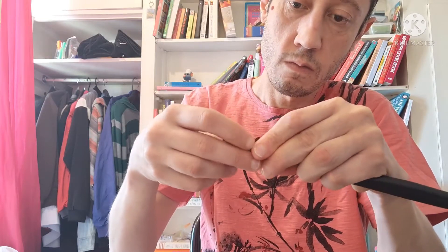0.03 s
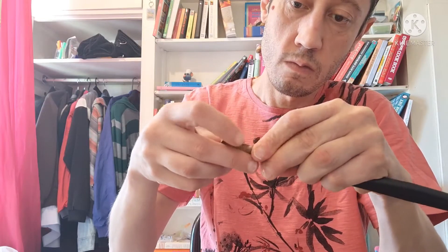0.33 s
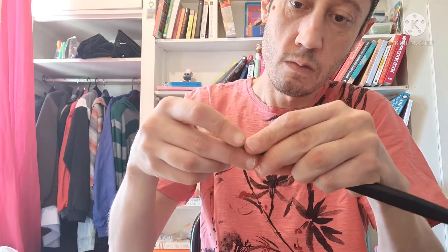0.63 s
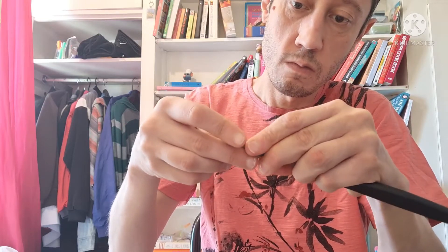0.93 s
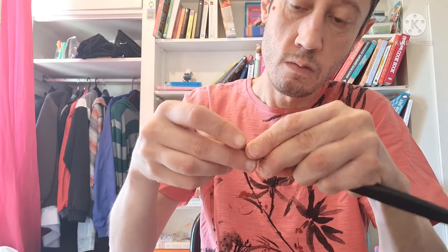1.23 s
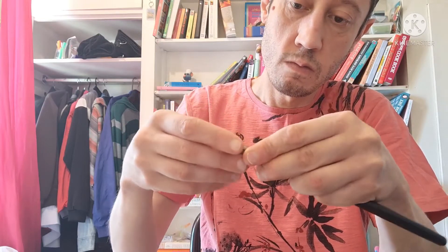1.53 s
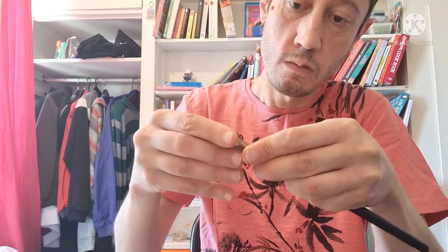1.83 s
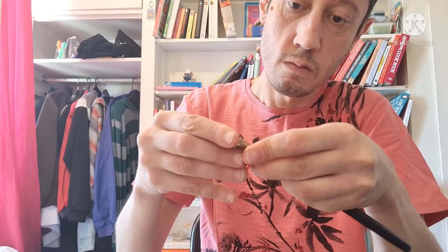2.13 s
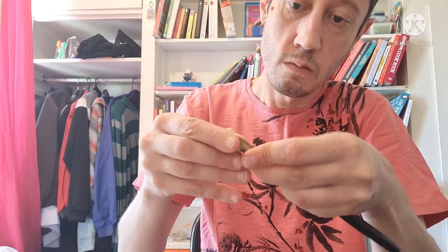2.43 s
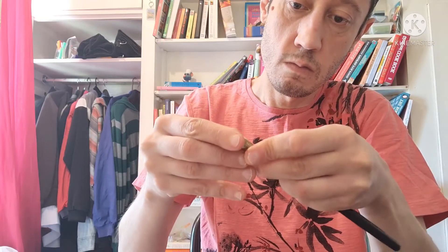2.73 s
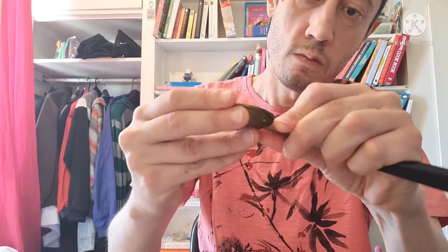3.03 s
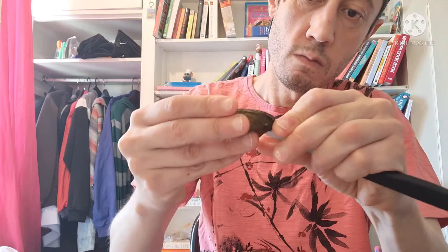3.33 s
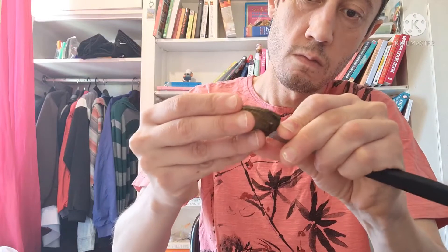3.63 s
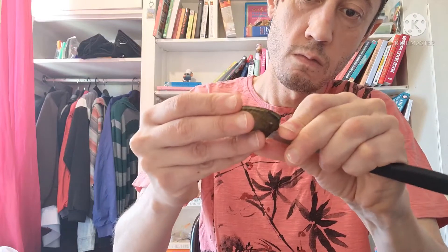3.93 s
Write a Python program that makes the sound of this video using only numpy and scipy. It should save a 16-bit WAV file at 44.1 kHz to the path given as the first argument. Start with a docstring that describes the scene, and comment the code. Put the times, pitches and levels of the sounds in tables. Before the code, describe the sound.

A small shell clicks, scrapes and cracks under a hand tool in a quiet room.

```python
"""A quiet furnished room, a phone microphone close to a small shell being picked at with a hand tool.
The tip ticks and scrapes on the shell, then bites, and the rim chips in a run of sharp cracks.
Every contact rings the same short shell modes, followed by quick reflections and a brief room tail.
Behind the work lie a wavering low hum and soft room noise."""
import sys
import numpy as np
from scipy import signal
from scipy.fft import rfft, irfft
from scipy.io import wavfile

SR = 44100
rng = np.random.default_rng(int(sys.argv[2]) if len(sys.argv) > 2 else 0)


def bounce(signal):
    """Save signal as a 16-bit WAV file at the path given by the first command-line argument."""
    frames = np.transpose(np.atleast_2d(signal))
    limited = np.clip(frames, -1, 1)
    pcm = np.round(limited * 32767).astype(np.int16)
    wavfile.write(sys.argv[1], SR, pcm)


N = 176400

# the five registers of a contact, named knock, body, edge, ring and fizz:
# (low edge [Hz], high edge [Hz], room send [dB], lag at the right microphone port [s])
REGISTERS = [(774, 3330, -4, 0.000089), (2765, 5040, -8, 0.000062), (4130, 5480, -8, 0.000066),
             (6400, 9340, -10, 0.00012), (10200, 18000, -7.5, 0.000066)]


def undb(db):
    """Decibels to gain."""
    return 10 ** (np.asarray(db) / 20)


def unit(x):
    """Scale to rms 1."""
    return x / np.sqrt(np.mean(x ** 2) + 1e-30)


def fader(points):
    """Gain curve through (time [s], level [dB]) points."""
    return undb(np.interp(np.arange(N) / SR, *np.array(points).T))


def decay(t, t60):
    """Envelope that falls 60 dB in t60 seconds."""
    return np.exp(-np.log(1000) * t / t60)


def colour(x, points):
    """Shape a sound by (frequency [Hz], gain [dB]) points on a log-frequency axis."""
    hz, db = np.array(points).T
    f = np.maximum(np.fft.rfftfreq(N, 1 / SR), 1)
    return irfft(rfft(x) * undb(np.interp(np.log(f), np.log(hz), db)), N)


def walk(rate_hz):
    """Smooth random drift with rms 1."""
    f = np.fft.rfftfreq(N, 1 / SR)
    return unit(irfft(rfft(rng.standard_normal(N)) * np.exp(-.5 * (f / rate_hz) ** 2), N))


def tones(partials, level, drift_hz):
    """Sines that wander in pitch and beat, under one level curve."""
    x = sum(undb(db) * np.sin(2 * np.pi * np.cumsum(hz + wander * walk(drift_hz)) / SR)
            for hz, db, wander in partials)
    return np.sqrt(2) * x * fader(level)


def room_noise():
    """Soft room tone that eases off slowly, near the centre in the bass and wide above."""
    # room tone spectrum: (frequency [Hz], relative density [dB])
    air_spectrum = [(20, -5.5), (45, 5), (70, 2), (85, 2), (100, 1), (150, -8.5), (200, -1.5), (280, -6.5),
                    (360, -12.5), (480, -3.5), (530, -11), (680, -0.5), (810, -2.5), (900, 1.5),
                    (1120, -6.5), (1450, -23), (2200, -26.5), (3100, -26.5), (5000, -34.5), (9000, -42.5),
                    (12000, -38.5), (16000, -40.5)]
    # its stereo width: (frequency [Hz], side minus mid [dB])
    air_width = [(60, -5.5), (150, -11), (300, -7.5), (600, -2.5), (950, 5), (2000, -0.5), (10000, 0.5)]
    # its loudness: (time [s], level [dB])
    air_level = [(0, -57), (1.3, -56.5), (2.1, -57.5), (4, -59.5)]
    mid, side = rng.standard_normal((2, N))
    pair = mid + colour(side, air_width) * np.array([[1], [-1]])
    flatten = [(hz, -10 * np.log10(1 + undb(db) ** 2)) for hz, db in air_width]  # width adds no power
    return fader(air_level) * unit(colour(colour(pair, flatten), air_spectrum))


def hum(pan_db=-2.5):
    """Two close low tones beat, a little to the right, and die away; a narrow drone wavers above."""
    # hum partials: (frequency [Hz], relative level [dB], wander [Hz])
    hum_partials = [(56.3, 0, 1.23), (47.8, -8.5, 1.68), (109.3, -27, 7.08)]
    # swell of the hum: (time [s], level [dB])
    hum_level = [(0, -57.5), (.2, -56), (.3, -51.5), (.78, -50.5), (1.02, -59), (1.2, -54.5),
                 (1.451, -52.5), (1.8, -48.5), (2.05, -51.5), (2.25, -49), (2.6, -49.5), (2.87, -60),
                 (3.05, -54), (3.16, -70), (4, -71.5)]
    # the drone's two close tones: (frequency [Hz], relative level [dB], wander [Hz])
    drone_partials = [(224.3, -1.5, 3.43), (218.5, -3.5, 2.985)]
    # swell of the drone: (time [s], level [dB])
    drone_level = [(0, -63.5), (.6, -66), (1.1, -68), (1.6, -64), (2.1, -66.5), (2.8, -59.5), (3.2, -64.5),
                   (4, -70.5)]
    low = tones(hum_partials, hum_level, drift_hz=2.68)
    drone = tones(drone_partials, drone_level, drift_hz=4.03)
    return low * undb(np.array([[pan_db], [-pan_db]]) / 2) + drone


def room(registers, tail_t60_s=0.17, near_t60_s=0.085, near_db=5, gap_s=0.0033):
    """Direct sound at two ports, quick reflections from hands and chest, and the short room tail."""
    t, samples = np.arange(SR // 2) / SR, np.arange(N)
    tail, near = (unit(rng.standard_normal((2, len(t))) * decay(t, t60) * (t > gap_s))
                  for t60 in (tail_t60_s, near_t60_s))
    echo = unit(tail + undb(near_db) * near) / np.sqrt(len(t))
    direct, send = 0, 0
    for (left, right), (_, _, send_db, lag) in zip(registers, REGISTERS):
        late_right = np.interp(samples - lag * SR, samples, right)
        direct = direct + np.array([left, late_right])
        send = send + undb(send_db) * np.array([left, right])
    return direct + signal.fftconvolve(send, echo, axes=1)[:, :N]


def two_ports(count, own_gain=0.38):
    """Contact noise as two microphone ports get it: mostly shared, partly their own."""
    noise = rng.standard_normal((3, count))
    return noise[0] + own_gain * noise[1:]


def shell(force, tip_hz, levels_db, length_s, noise_db):
    """A force rings the shell over bare contact noise; each register gets its level over length_s."""
    # shell modes: (frequency [Hz], relative level [dB], t60 [s])
    shell_modes = [(943, -16, 0.0094), (1846, -5.5, 0.0045), (3084, -0.5, 0.02), (3227, -16, 0.088),
                   (3544, -3.5, 0.012), (4435, -11.5, 0.0051), (4864, -12, 0.011), (5556, -9, 0.012),
                   (6460, -11, .007), (11630, -12.5, 0.0043), (13800, -8, 0.0021)]
    tip_db, tip_t60_s = 1, 0.0049  # a bright mode whose pitch depends on where the tip bears
    t = np.arange(SR // 10) / SR
    centres = np.array([np.sqrt(lo * hi) for lo, hi, *_ in REGISTERS])
    rings = np.zeros((len(REGISTERS), len(t)))
    for hz, db, t60 in shell_modes + [(tip_hz, tip_db, tip_t60_s)]:
        nearest = np.argmin(abs(np.log(centres / hz)))
        rings[nearest] += undb(db) * np.sin(2 * np.pi * hz * t) * decay(t, t60)
    out = []
    for ring, (lo, hi, *_), db in zip(rings / np.linalg.norm(rings), REGISTERS, levels_db):
        ringing = signal.fftconvolve(force, ring[None], axes=1)[:, :force.shape[1]]
        bandpass = signal.butter(4, [lo, hi], btype="band", fs=SR, output="sos")
        part = signal.sosfilt(bandpass, ringing + undb(noise_db) * force)
        out.append(part * undb(db) * np.sqrt(2 * length_s * SR) / np.linalg.norm(part))
    return np.array(out)


def scrapes(catches_per_s=2200, spread_db=3, tip_hz=7190):
    """The tip drags over ridges: dense uneven catches that swell and fade."""
    # strokes of the tip: (centre [s], length [s], knock [dB], body [dB], edge [dB], ring [dB], fizz [dB])
    strokes = [(0.023, 0.016, -74, -79, -92, -87, -97), (0.481, 0.045, -77, -83, -89, -84.5, -89),
               (1.476, 0.024, -71, -72.5, -90, -85, -88), (2.029, 0.079, -78, -83, -96, -96, -95),
               (2.55, 0.017, -82, -74, -81, -79, -82), (2.573, 0.02, -69.5, -59, -76, -74, -76),
               (2.605, 0.029, -64.5, -62, -68.5, -73, -76.5), (2.731, 0.048, -66.5, -75.5, -82.5, -88, -89),
               (3.105, 0.047, -70, -69, -84, -83, -85), (3.389, 0.026, -83, -63, -66, -68.5, -86),
               (3.416, 0.016, -93, -53, -66, -70, -88), (3.458, 0.018, -96, -49, -53.5, -58, -69.5),
               (3.585, 0.048, -95, -73, -80.5, -85, -93), (3.698, 0.038, -81, -65.5, -78, -74, -80),
               (3.731, .028, -77, -49.5, -62, -53.5, -57.5), (3.81, 0.022, -76, -68, -56, -59, -58),
               (3.995, 0.077, -90, -58, -67.5, -65, -65)]
    out = np.zeros((len(REGISTERS), 2, N))
    t = np.arange(SR // 5) / SR - .1
    for centre, length, *levels in strokes:
        catches = rng.random(len(t)) < catches_per_s / SR
        strength = undb(spread_db * rng.standard_normal(len(t)))
        swell = np.exp(-np.pi / 2 * (t / length) ** 2)
        force = two_ports(len(t)) * catches * strength * swell
        add(out, centre + t[0], shell(force, tip_hz, levels, length, noise_db=-6))
    return out


def cracks(splinter_db=1):
    """Each tick or crack is one snap inside a millisecond or so of splintering; both ring the shell."""
    # ticks and cracks: (time [s], rise of the fracture [s], bright mode [Hz],
    # knock [dB], body [dB], edge [dB], ring [dB], fizz [dB])
    fractures = [(.8120, 0.00023, 7000, -84, -84, -80, -71, -72),
                 (0.9533, 0.0006, 6850, -45, -52.5, -63, -56.5, -68),
                 (1.737, 0.00063, 6400, -64.5, -55.5, -67, -64, -59.5),
                 (2.0558, 0.00012, 6800, -59.5, -62, -79, -73, -73),
                 (2.2747, .0005, 6100, -61, -44.5, -41, -53, -49.5),
                 (3.1591, 0.00046, 6400, -58.5, -36, -48, -66, -68),
                 (3.1598, 0.00021, 6400, -77, -36.5, -62, -78, -68),
                 (3.2270, 0.00018, 6400, -80, -79, -67.5, -67, -70),
                 (3.7154, 0.00041, 7560, -79, -38, -47, -41, -55),
                 (3.7198, .0002, 7660, -82, -46, -42, -49, -62),
                 (3.7226, 0.00017, 7800, -68, -65, -59, -60, -67),
                 (3.7295, 0.00026, 7700, -56.5, -43, -42, -36, -44),
                 (3.7320, 0.00024, 7700, -78, -36, -43.5, -33, -49),
                 (3.7358, 0.00055, 7620, -74, -33, -42, -33, -50),
                 (3.74, .0002, 7800, -78, -39, -49, -40, -52),
                 (3.743, 0.00024, 7860, -61, -53, -45, -44, -63),
                 (3.7836, .0005, 7400, -59, -26, -33, -38, -39),
                 (3.8074, .0007, 7600, -86, -24, -31.5, -29, -35),
                 (3.8208, .0007, 7520, -49.5, -25.5, -35, -35, -43.5),
                 (3.938, .0004, 7450, -59, -35, -42.5, -33.5, -50.5),
                 (3.9764, .0004, 7400, -65, -40, -38.5, -32.5, -53),
                 (3.9899, 0.00063, 7150, -69, -45, -42, -42, -46),
                 (3.9994, .0002, 7500, -68, -30, -43, -29, -55)]
    out = np.zeros((len(REGISTERS), 2, N))
    t = np.arange(SR // 10) / SR
    for start, rise, tip_hz, *levels in fractures:
        splinters = two_ports(len(t)) * (t * np.exp(-t / rise)) ** 2
        snap = np.arange(len(t)) == int(rise * SR)
        force = snap + undb(splinter_db) * unit(splinters) / np.sqrt(len(t))
        add(out, start, shell(force, tip_hz, levels, length_s=.002, noise_db=-15))
    return out


def add(out, start_s, x):
    """Mix x into out from a given time."""
    i = int(start_s * SR)
    lo, hi = max(i, 0), min(i + x.shape[-1], N)
    if hi > lo:
        out[..., lo:hi] += x[..., lo - i:hi - i]


def scene():
    """Tool work on the shell, close up, over the background of the room."""
    return room(cracks() + scrapes()) + hum() + room_noise()


def record(dry, top_hz=16000):
    """The phone cuts the highest treble steeply."""
    return signal.sosfilt(signal.ellip(10, .2, 70, top_hz, fs=SR, output="sos"), dry)


dry = scene()
out = record(dry)
bounce(out)
```